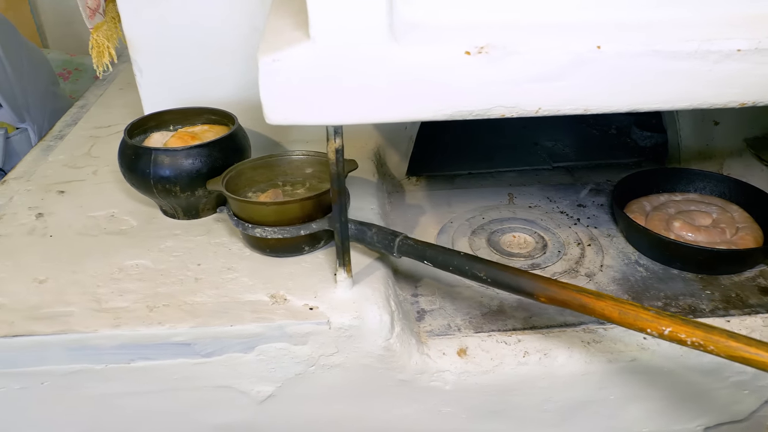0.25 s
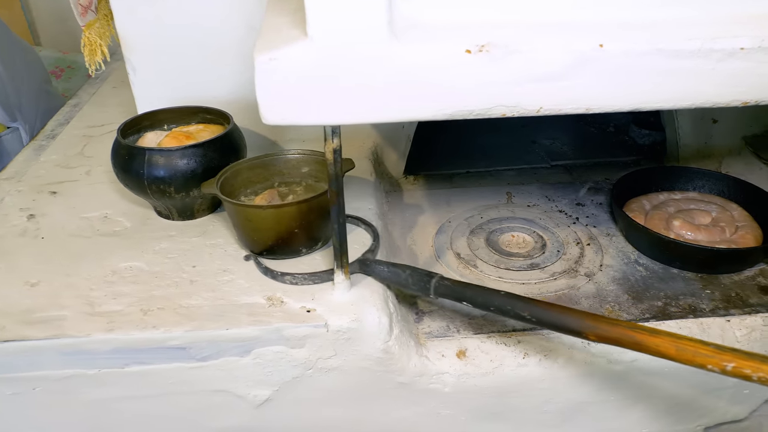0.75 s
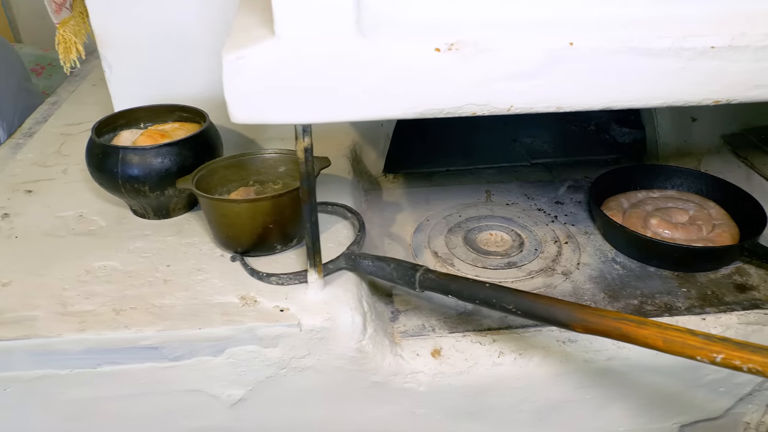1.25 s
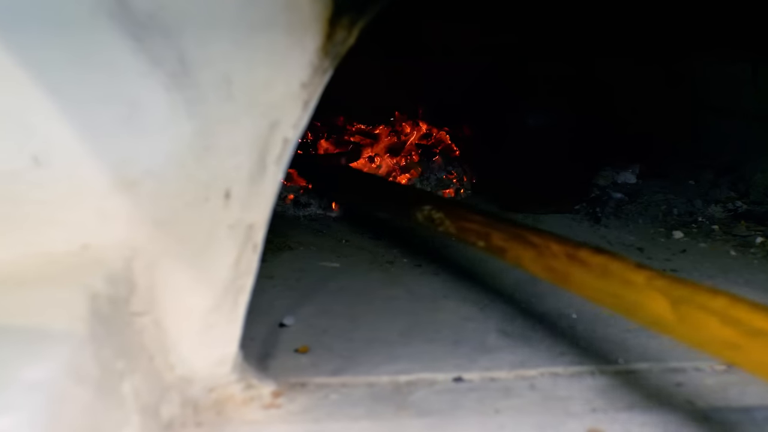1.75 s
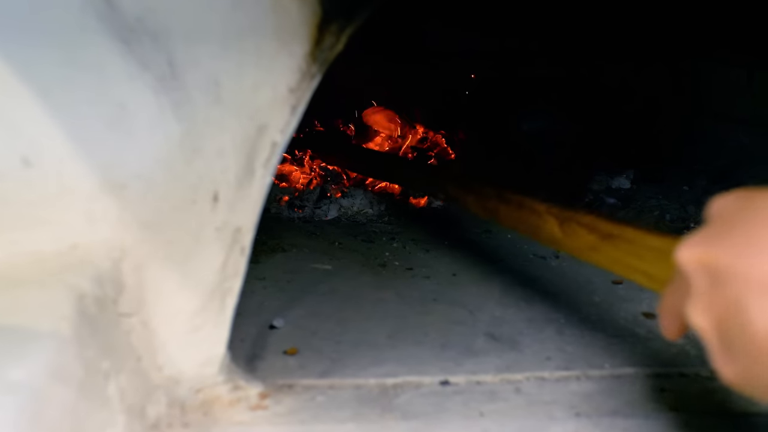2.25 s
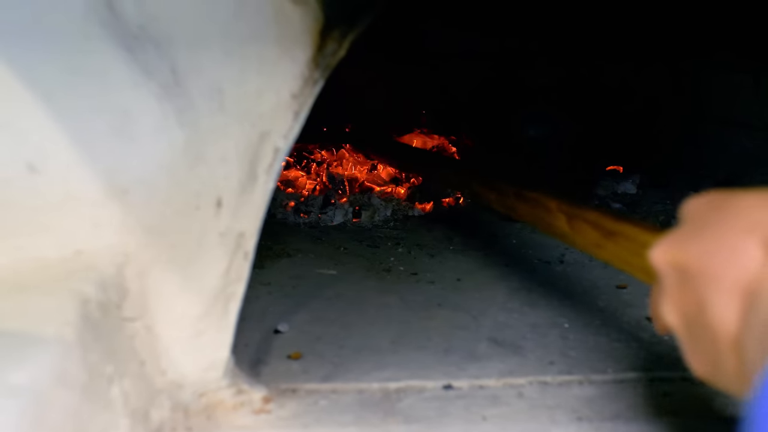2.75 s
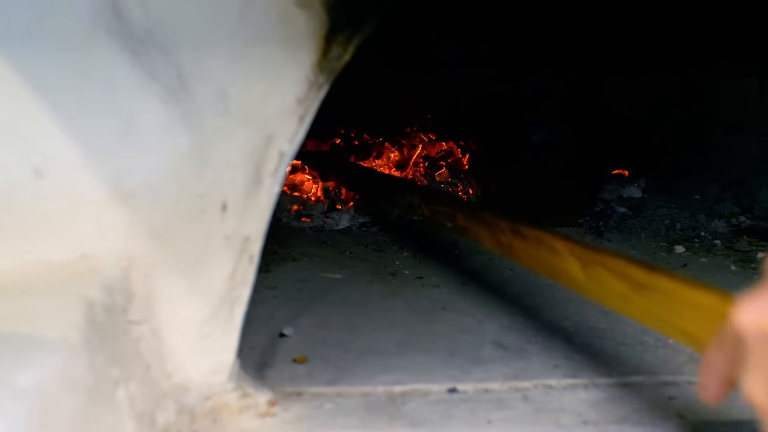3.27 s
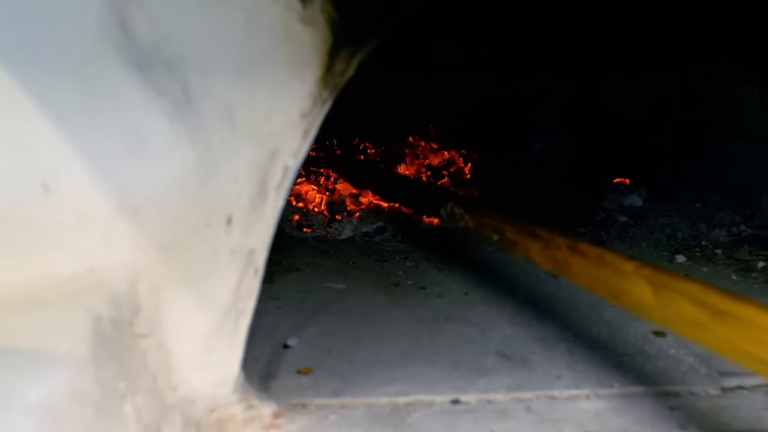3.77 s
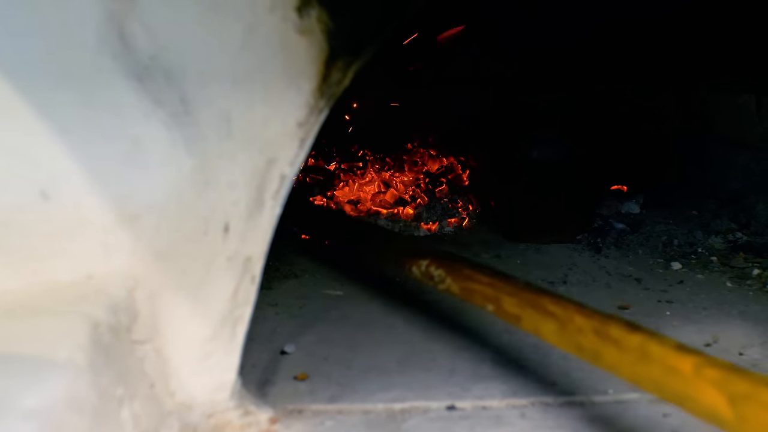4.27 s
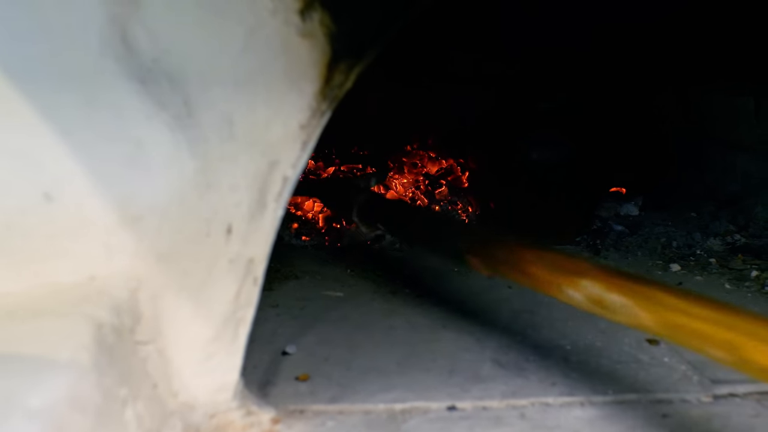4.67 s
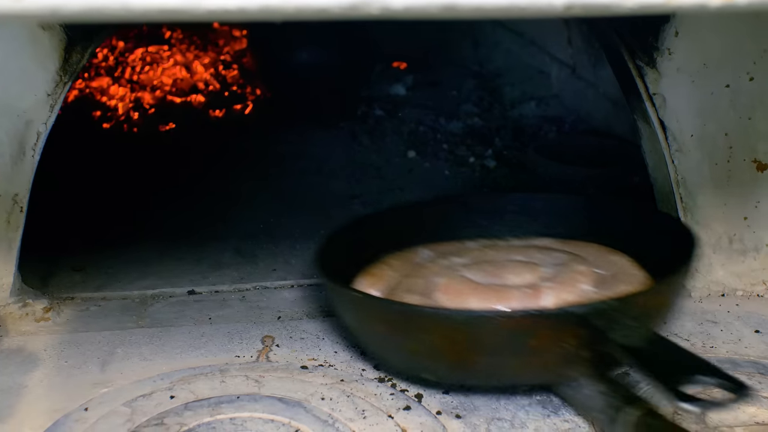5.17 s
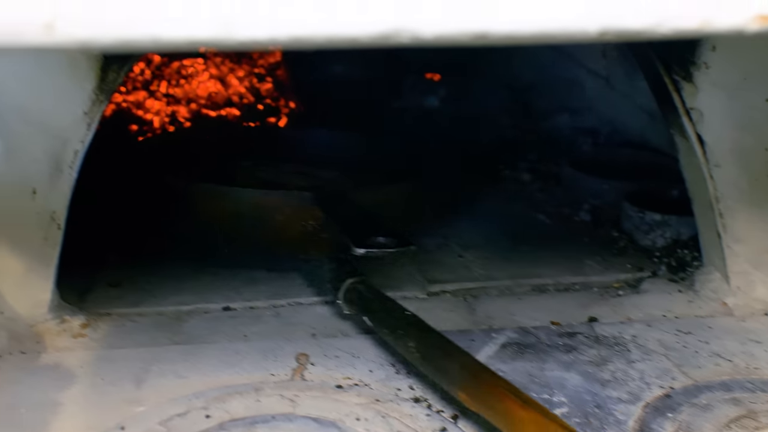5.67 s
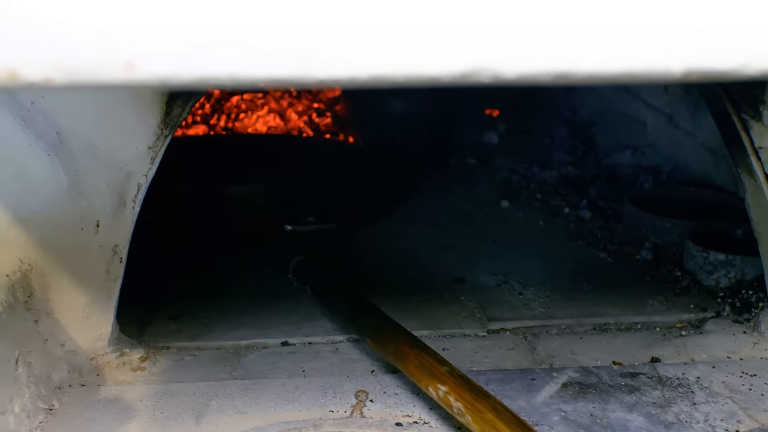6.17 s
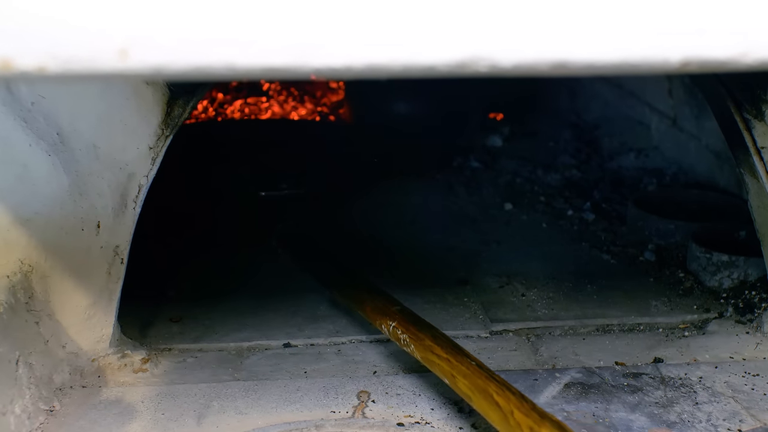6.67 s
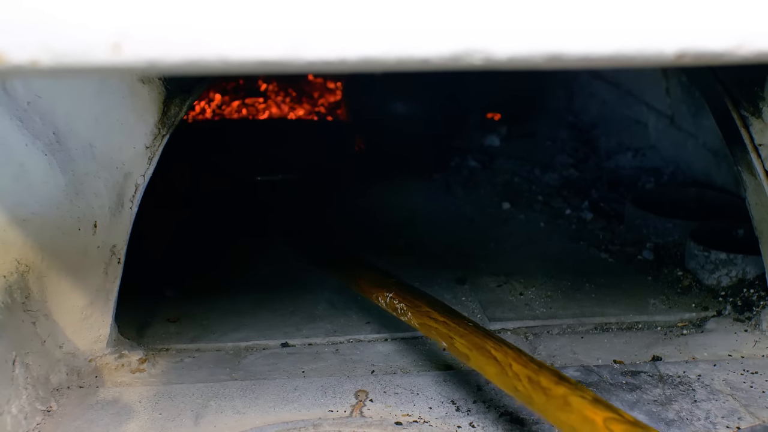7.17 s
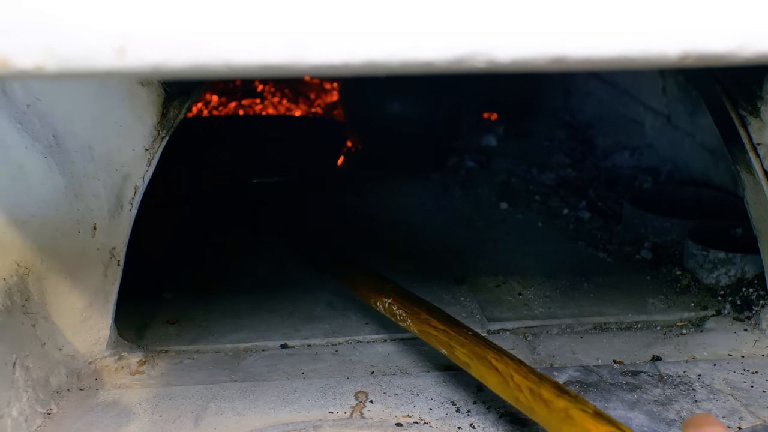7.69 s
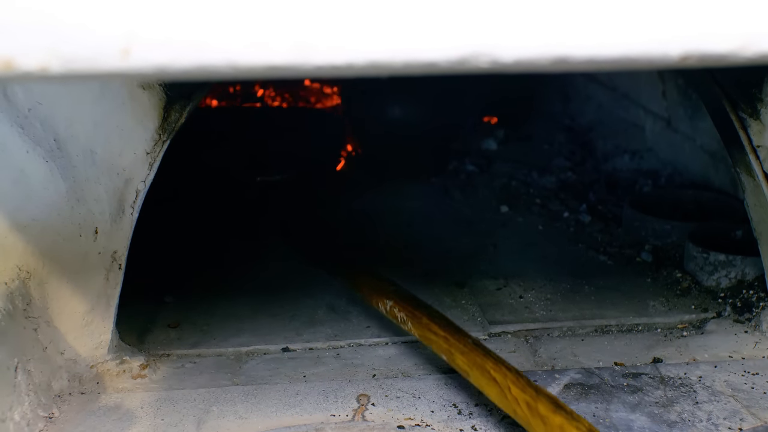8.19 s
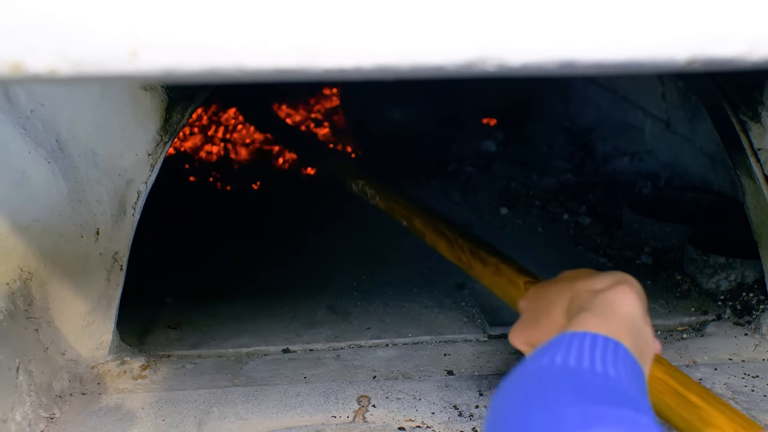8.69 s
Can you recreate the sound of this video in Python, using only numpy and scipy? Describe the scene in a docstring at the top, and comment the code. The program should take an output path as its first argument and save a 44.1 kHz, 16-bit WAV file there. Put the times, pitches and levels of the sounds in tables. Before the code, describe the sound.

Close phone sound in a quiet kitchen with faint low air and a short, dull brick-vault tail. From 0 to 1.4 s an iron fork makes light taps and small scrapes against a pot, with one sharper clack at 0.6. From 1.6 it jabs and rakes embers: hard clanks near 1.63, 2.2, 3.27, 3.76 and 4.23, crunchy strokes, snapping crumbs and thin squeals around 2.3 kHz. After a ringing skid at 4.35 it quiets. A heavy iron pan scrapes over gritty brick at 5.0-5.3, with a very faint falling whistle at 5.4. A loud clipped bang at 5.83 starts rough grinding, with another blow at 6.27; the harshest, loudest shoves come at 6.9-7.4. A duller knock follows at 7.7 in a lull. At 8.3 the fork squeals, clonks low and ringing at 8.54, and gives a short gritty rake at 8.88.

```python
"""Iron tool on a brick hearth

A long iron oven tool works close to a phone. First its forked head jabs and rakes through embers;
then it shoves a heavy cast-iron pan over the gritty floor and rakes once more. Grit and blows are a
train of small forces that drive damped modes of the iron and coloured crunch of brick and coal.
Chips, squeals, lone rings and a faint whistle join in. The brick vault adds a short tail over the
quiet kitchen air, and loud blows clip.
"""
import sys
import numpy as np
from scipy import signal
from scipy.fft import rfft, irfft
from scipy.io import wavfile
from scipy.ndimage import uniform_filter1d

SR = 44100
rng = np.random.default_rng(int(sys.argv[2]) if len(sys.argv) > 2 else 0)


def dump_mix(stems):
    """Bounce the given channels to the path in sys.argv[1] as a 16-bit WAV at rate SR."""
    frames = np.atleast_2d(stems).T  # one column per channel
    limited = np.clip(frames, -1, 1)  # hard clip at full scale
    pcm = np.round(limited * 32767).astype(np.int16)
    wavfile.write(sys.argv[1], SR, pcm)


N = 394254

# Every contact force has three parts: drag (between the two limits), thud (below) and crack (above)
THUD_HZ, CRACK_HZ = 600, 4500
PAN_FROM_S, PAN_TO_S = 4.33, 8.19  # the pan is shoved between these times, the fork works outside them


def undb(db):
    """Decibel law: the amplitude gain of a level in dB."""
    return 10 ** (np.asarray(db) / 20)


def unit(x):
    """Energy normalisation: the sum of squares becomes 1."""
    return x / np.sqrt(np.sum(x ** 2))


def fade(t60, size):
    """Exponential decay: 60 dB down after t60 s."""
    return np.exp(-np.log(1000) * np.arange(size) / SR / t60)


def walk(rate):
    """Slow random modulation: Gaussian levels 1 / rate s apart, joined by straight lines."""
    k = int(SR / rate)
    held = np.repeat(rng.standard_normal(N // k + 1), k)
    return uniform_filter1d(held, k)[:N]


def shape(points, size):
    """Spectral envelope: gain at each frequency of a transform, from (Hz, dB) points on a log axis."""
    hz, db = np.transpose(points)
    bins_hz = np.fft.rfftfreq(size, 1 / SR)
    return undb(np.interp(np.log(bins_hz + 1), np.log(hz), db))


def part_of(hz):
    """Band splitting: which force drives a frequency, 0 drag, 1 thud or 2 crack."""
    return np.where(hz < THUD_HZ, 1, np.where(hz > CRACK_HZ, 2, 0))


def ring(force, hz, t60):
    """Damped resonance: a complex one-pole filter; a white force of rms 1 gives a ring of rms 1."""
    pole = np.exp(2j * np.pi * hz / SR - np.log(1000) / (t60 * SR))
    gain = np.sqrt(2 * (1 - abs(pole) ** 2))
    return gain * signal.lfilter([1], [1, -pole], force + 1e-18).imag


def straying(force, hz, t60):
    """Resonance of drifting frequency: the force is shifted to 0 Hz, damped there and shifted back."""
    wander = 0.0078  # share by which the pitch strays as the contact moves
    turn = np.exp(2j * np.pi * np.cumsum(hz * (1 + wander * walk(12))) / SR)
    pole = np.exp(-np.log(1000) / (t60 * SR))
    swing = signal.lfilter([1], [1, -pole], (force + 1e-18) * turn.conj())
    return np.sqrt(2 * (1 - pole ** 2)) * (turn * swing).imag


def kitchen():
    """Stationary coloured noise: quiet room air and draught of the fire, swelling slightly."""
    # spectrum of the air: frequency_hz, relative_level_db
    air_spectrum = [(15, -14), (25, 21.5), (108, 5.5), (355, -8), (466, -5), (1020, -15.5), (2240, -16.5),
                    (10500, -26), (14900, -26), (16200, -45)]
    air = unit(irfft(rfft(rng.standard_normal(N)) * shape(air_spectrum, N), N))
    return air * np.sqrt(N) * undb(-43.5 + .8 * walk(3))


def whistle():
    """Frequency and amplitude modulation: a faint thin tone, unsteady in both, that bends down."""
    # course of the tone: time_s, pitch_hz, level_db
    tone_course = [(5.33, 4750, -60), (5.37, 5050, -61), (5.44, 4700, -63), (5.54, 3520, -66)]
    s, hz, db = np.transpose(tone_course)
    t = np.arange(N) / SR
    turn = np.cumsum(np.interp(t, s, hz) * (1 + .012 * walk(90))) / SR
    level_db = np.interp(t, s, db, -150, -150) + 6 * walk(50)
    return undb(level_db) * np.sin(2 * np.pi * turn)


def vault(dry):
    """Diffuse reverberation: short dense tail of the brick vault, duller than the direct sound."""
    t60_s, level_db, dull_hz = 0.085, -19.5, 3870
    size = SR // 2
    noise = signal.lfilter(*signal.butter(1, dull_hz, fs=SR), rng.standard_normal(size))
    tail = unit(noise * fade(t60_s, size))
    return dry + undb(level_db) * signal.oaconvolve(dry, tail)[:N]


def pings():
    """Free decay of single modes: each lone ring swells for a few milliseconds and dies away."""
    # lone rings: start_s, pitch_hz, level_db (before onset and decay), t60_s
    lone_rings = [(0.402, 434, -25.5, 0.22), (0.524, 199, -17, 0.082), (0.904, 202, -18.5, 0.078),
                  (1.285, 2550, -24.5, 0.15), (3.005, 974, -24.5, 0.17), (4.25, 3130, -33, 0.23),
                  (4.66, 2000, -47, 0.25), (5.199, 1600, -38.5, 0.51), (7.78, 240, -16, 0.037),
                  (7.862, 202, -18, 0.1), (8.538, 406, -6.5, 0.096)]
    out, size = np.zeros(N + SR), SR
    t = np.arange(size) / SR
    onset = 1 - np.exp(-t / 0.0013)
    for s, hz, db, t60 in lone_rings:
        out[int(s * SR):][:size] += undb(db) * onset * fade(t60, size) * np.sin(2 * np.pi * hz * t)
    return out[:N]


def squeal(drag_force):
    """Friction-driven resonance: an edge of the iron sings roughly on one pitch while it skids."""
    # skids: start_s, end_s, pitch_hz, level_db (re drag), t60_s
    skids = [(1.66, 1.87, 2322, -6, 0.19), (2.226, 2.53, 2310, -5.5, .12), (2.542, 2.758, 2460, 0.5, 0.089),
             (4.34, 4.6, 2233, 0, .6), (2.79, 3.08, 2315, -10, .1), (5.94, 6.272, 3270, -17, 0.09),
             (6.942, 7.405, 791, -10.5, 0.13), (8.301, 8.474, 2210, -0.5, 0.28)]
    t = np.arange(N) / SR
    return sum(undb(db) * straying(drag_force * (t > start) * (t < end), hz, t60)
               for start, end, hz, db, t60 in skids)


def chips(slide, db, per_s, count):
    """Random impulses on resonators: crumbs of coal and brick snap under the iron and ring briefly.

    Each of count pitches snaps per_s times a second on average, as hard as the slide presses.
    """
    pressure = uniform_filter1d(np.abs(slide), 256, axis=1)
    out = 0
    for hz in np.geomspace(900, 11000, count) * rng.uniform(.95, 1.05, count):
        snaps = (rng.random(N) < per_s / SR) * rng.standard_normal(N) * np.sqrt(SR / per_s)
        out = out + ring(snaps * pressure[part_of(hz)] + 1e-18, hz, 107.0 / hz)
    return undb(db) * out / np.sqrt(count / 2)


def crunch(force, points):
    """Non-resonant filtering: brick and coal only colour each force, by a minimum-phase response."""
    size = 2048
    # folding the cepstrum onto positive times makes the response causal
    cepstrum = irfft(np.log(shape(points, size)))
    cepstrum[1:size // 2] *= 2
    tap = irfft(np.exp(rfft(cepstrum[:size // 2], size)))
    out = 0
    parts = ((THUD_HZ, CRACK_HZ), "band"), (THUD_HZ, "low"), (CRACK_HZ, "high")
    for f, (hz, kind) in zip(force, parts):
        band = signal.butter(2, hz, kind, fs=SR, output="sos")
        out = out + signal.oaconvolve(f, unit(signal.sosfilt(band, tap)))[:N]
    return out


def bricks(slide, hit, early):
    """Dry contact noise: the crunch of brick and coal under the fork, then under the pan."""
    # crunch spectra: frequency_hz, relative_level_db
    fork_colour = [(26, -61), (45, -3.5), (150, -6.5), (234, 5), (363, -4.5), (2300, -12), (7000, -19),
                   (16000, -27.5)]
    pan_colour = [(26, -64.5), (70, -19.5), (280, 7), (838, 3.5), (1070, 1), (4200, -15), (5700, -24.5),
                  (8000, -23), (16000, -37)]
    under_fork = crunch(early * (slide + undb(-8) * hit), fork_colour)
    under_pan = crunch(~early * undb(-9) * (slide + hit), pan_colour)
    return under_fork + under_pan


def grit(spread_db, slip_db):
    """Stick-slip friction: dense grains of uneven size come in clumps as the contact catches. Rms 1."""
    size_db = spread_db * np.minimum(rng.exponential(size=N), 5)
    # the whole tool catches together, while each part also stutters on its own
    slip = walk(60) + 1.86 * np.array([walk(200), walk(90), 1.06 * walk(140)])
    grains = rng.standard_normal((3, N)) * undb(size_db + slip_db * slip)
    return grains / grains.std(axis=1, keepdims=True)


def drag():
    """Sliding friction: the drag, thud and crack forces of strokes that swell, hold and fade."""
    # strokes of the fork through the embers and shoves of the pan over the bricks:
    # full_speed_from_s, level_db (of the drag force), swell_s, hold_s, fade_s,
    # thud_db (heavy rumble re drag), crack_db (fine grit re drag)
    strokes = [(0.0, -46, .01, 0.0076, 0.27, 11, 3.5), (0.348, -46, 0.062, 0.13, 0.19, 1, -4.5),
               (0.514, -57, .005, 0.035, 0.18, 22, 1), (0.617, -31, 0.006, 0.0057, 0.2, -20, -16),
               (0.769, -31, 0.0018, 0.014, 0.1, -3, -3), (0.871, -39, 0.0088, 0.036, 0.2, 0, -7.5),
               (1.055, -37, 0.019, 0.026, 0.033, 5, -2), (1.236, -31, 0.25, 0.02, 0.18, -2, -4),
               (1.627, -20, 0.046, 0.013, 0.034, -8, -4), (1.657, -36, 0.025, 0.16, 0.18, -1, -5.5),
               (1.886, -57, 0.13, 0.2, 0.16, 16.5, -2.5), (2.182, -20, 0.016, 0.0054, 0.078, 0.5, -4.5),
               (2.344, -33.5, 0.27, 0.077, 0.23, -2, -1.5), (2.788, -28, 0.016, 0.031, 0.048, 5.5, 1),
               (2.851, -39, 0.052, 0.082, 0.3, 9.5, 1.5), (3.162, -37.5, 0.017, 0.042, 0.082, 0.5, -2.5),
               (3.272, -32.5, 0.086, 0.05, 0.2, -5.5, -2), (3.748, -30, 0.023, 0.0076, 0.16, 1, -2),
               (4.201, -24, 0.0047, 0.029, 0.092, -7, -9.5), (4.338, -42.5, 0.083, 0.036, 0.43, -9.5, -30),
               (4.536, -46.5, 0.041, 0.14, 0.96, -10, 7.5), (4.978, -16, 0.2, 0.16, 0.13, -7.5, -5),
               (5.265, -52, 0.055, 0.055, 1.8, 2, -1), (5.835, -17, 0.0092, 0.0042, 0.031, -5, 2),
               (5.87, -23, 0.04, 0.11, .1, -7.5, -17), (5.975, -18, 0.1, 0.15, 0.29, -11.5, -35),
               (6.273, -17, 0.33, 0.091, 0.36, -3.5, -13), (6.418, -18, 0.082, 0.21, 0.19, -5.5, -9.5),
               (6.76, -42, .1, 0.14, .1, -5, 8), (6.961, -10, 0.13, 0.057, 0.1, -3.5, -8.5),
               (7.143, -10.5, 0.14, 0.058, 0.23, -3.5, -21), (7.322, -6.5, 0.059, 0.037, 0.11, -3.5, -13.5),
               (7.475, -32, 0.039, 0.014, 0.23, 0.5, -6.5), (7.692, -31.5, 0.011, 0.0058, 0.051, 8, -3),
               (7.713, -40, 0.022, 0.02, 0.36, 8.5, 0), (8.249, -35, 0.09, 0.043, 0.37, 5, -11.5),
               (8.356, -42.5, 0.083, 0.015, 0.16, -8, 7), (8.534, -18.5, 0.0033, 0.009, 0.021, 10, -37),
               (8.568, -35.5, .02, 0.011, 0.24, 14.5, -27), (8.875, -20.5, 0.029, 0.013, 0.057, 0.5, -7.5)]
    swell_db = 30  # swell and fade lengths are counted over this many dB
    t, power = np.arange(N) / SR, np.zeros((3, N))
    for s, level_db, swell, hold, fall, thud_db, crack_db in strokes:
        away = np.maximum((s - t) / max(swell, 1e-3), (t - s - hold) / max(fall, 1e-3))
        near = away < 2
        parts_db = level_db + np.array([[0], [thud_db], [crack_db]])
        power[:, near] += undb(parts_db - swell_db * np.maximum(away[near], 0)) ** 2
    return np.sqrt(power) * grit(spread_db=2.2, slip_db=2.1)


def blows():
    """Impact: one sharp tap, then a chatter as the iron settles; a catch is a small bright blow."""
    # blows and ticks: start_s, level_db (relative), thud_db (re level), crack_db (re level), chatter_ms
    impacts = [(0.039, -17.5, 7.5, 4, 0.73), (0.388, -20, -21, -17, 3.5), (0.402, -18, -33, -4.5, 11.3),
               (0.519, -22.5, 16, 10, 2.1), (0.6, -2, -41, 0, 8), (0.83, -18, -22, -24, 2.4),
               (0.861, -20.5, -20, 2.5, 4.5), (1.047, -20.5, -24.5, -9, 3.5), (1.596, -23, 0, 3, 6.4),
               (1.633, -7.5, -9, -3, 5.7), (1.782, -20.5, -3, -4, 3.7), (2.180, 1, -17, -18.5, 7.6),
               (2.315, -6, -32, -8, 4.1), (2.476, -25, 3, 18, 2.1), (2.794, -19, -15, 0, 23),
               (3.228, -13.5, -45, -23, 11), (3.27, 3, -7, -17, 2.35), (3.332, -16, -5, -17, 7.6),
               (3.448, -19.5, -4, 3.5, 4.3), (3.753, -2, -21, -8, 3.2), (3.767, -1, -41, -23, 6.8),
               (4.194, -12, -10, 7, 2.4), (4.231, -0.5, -15, -2.5, 6.1), (4.592, -27, -9.5, -5, 8.3),
               (5.832, 11.5, -8.5, -20, 2.5), (6.266, 2, -2.5, -22, 9.6), (7.299, 1.5, -3, -23, 6.9),
               (7.697, -5.5, -0.5, -5.5, 1.9), (8.244, -18, 21.5, -11.5, 2.1), (8.537, -3.5, 1, -35, 9.8),
               (8.638, -14.5, 0, -29, 6.7), (8.857, -19, -14, 4, 7.7)]
    # grains of grit that jam under the iron and crack: start_s, level_db (relative)
    jams = [(0.1144, -29), (0.1413, -28), (0.169, -32), (4.4907, -37), (4.537, -27), (4.645, -28),
            (4.9076, -27), (4.9307, -20), (4.9688, -4.5), (5.0554, -11), (5.1274, -7), (5.1805, -10),
            (5.562, -32), (5.655, -25), (5.7374, -46), (5.7857, -38), (5.91, -15), (5.9574, -22),
            (6.1868, -15), (6.314, -28), (6.4213, -10.5), (6.4748, -10), (6.5675, -13), (6.5959, -13),
            (6.624, -16.5), (6.8107, -27.5), (6.9272, -15), (6.9463, -5.5), (6.9586, -4), (7.0164, -12),
            (7.069, -13), (7.1215, -16), (7.1571, -11), (7.1801, -22), (7.228, -7), (7.256, -14),
            (7.2843, -18), (7.333, 0.5), (7.347, -13), (7.3665, -6), (7.4295, -26)]
    size = 4096
    force = np.zeros((3, N + size))
    ms = 1000 * np.arange(size) / SR
    rows = [(s, db + np.array([0, thud_db, crack_db]), chatter_ms)
            for s, db, thud_db, crack_db, chatter_ms in impacts]
    # catches: gain in dB on the drag, thud and crack parts, then chatter time in ms
    rows += [(s, db + np.array([-3, -18, 3]), 4.2) for s, db in jams]
    for (s, db, chatter_ms), rough in zip(rows, rng.standard_normal((len(rows), 3, size))):
        push = rough * (1 - np.exp(-ms / .3)) * np.exp(-ms / max(chatter_ms, .3))
        push[:, 0] = 4  # the tap
        at = int(s * SR)
        force[:, at:at + size] += 0.54 * undb(db)[:, None] * push
    return force[:, :N]


def iron(force, modes, shift_db, shift_rate):
    """Modal synthesis: as the contact wanders, each mode is driven more or less and strays in pitch."""
    out = 0
    for hz, db, t60 in modes:
        drive = force[part_of(hz)] * undb(db + shift_db * walk(shift_rate))
        out = out + straying(drive, hz, t60)
    return out


def rim(force, t):
    """Contact damping: the pan's rim rings out only while little weight rests on it."""
    # modes of the rim: frequency_hz, level_db (re the force), t60_s
    rim_modes = [(937, -8, .29), (1513, -11, .8), (1617, -11, .9), (1803, -10, .25), (2211, -3, 0.38),
                 (2575, -14, 0.2), (2990, -7, 0.3), (3865, -12, .3), (4935, -13, 0.33)]
    # times of little weight: start_s, end_s, level_db (gain added to the loaded one)
    free_spells = [(4.431, 4.853, -28), (7.33, 7.44, -34), (8.242, 8.627, -7.5)]
    loaded_db = -28
    freedom = undb(loaded_db) + sum(undb(db) * (t > a) * (t < b) for a, b, db in free_spells)
    on_rim = (t > PAN_FROM_S) * force * freedom
    return sum(undb(db) * ring(on_rim, hz, t60) for hz, db, t60 in rim_modes)


def pan(slide, hit, early):
    """Forced vibration of a heavy plate: grit and blows ring the cast-iron pan."""
    # modes of the pan: frequency_hz, level_db (re the force on their part), t60_s
    pan_modes = [(136.6, -19.5, 0.57), (232.6, -12.5, 0.33), (310.7, -3.5, 0.11), (419, -9, 0.17),
                 (448.7, -5.5, 0.1), (628, -14, 0.062), (847, -9, 0.059), (954, -14.5, 0.057),
                 (1298, -14.5, 0.045), (1487, -22, 0.064), (1768, -20, 0.16), (2250, -17, 0.027),
                 (2702, -16.5, 0.06), (2850, -25.5, .06), (3230, -23.5, 0.04), (3550, -25.5, 0.034),
                 (4000, -22, 0.035), (6480, -25, 0.027), (6950, -19, .012), (7400, -21, 0.012),
                 (10040, -32, 0.025)]
    return iron(~early * (undb(-4.5) * slide + hit), pan_modes, shift_db=7.0, shift_rate=14.0)


def fork(slide, hit, early, t):
    """Forced vibration of a bar: blows reach the forked iron better than sliding grit does."""
    # modes of the fork: frequency_hz, level_db (re the force on their part), t60_s
    fork_modes = [(119.3, -13, 0.38), (233.7, -10, 0.19), (298, -15.5, 0.2), (898, -27, 0.23),
                  (1446, -11, 0.035), (1802, -18.5, 0.038), (2299, -6, 0.057), (2553, -12.5, 0.059),
                  (3180, -14.5, 0.046), (7150, -10, 0.0018)]
    # for the first second the fork leans on a pot, which mutes its ring in the drag band by 8 dB
    held = undb(-8 * np.outer([1, 0, 0], t < 1.0))
    return iron(early * held * (undb(-13) * slide + hit), fork_modes, shift_db=2.2, shift_rate=9.0)


def scene():
    """Superposition: shared forces ring the fork, then the pan, then the fork again, under the vault."""
    slide, hit, t = drag(), blows(), np.arange(N) / SR
    early = (t < PAN_FROM_S) | (t > PAN_TO_S)  # True whenever the fork works
    metal = fork(slide, hit, early, t) + pan(slide, hit, early) + rim((slide + hit)[0], t)
    crumbs = chips(slide, db=-11, per_s=70, count=24)
    hearth = metal + bricks(slide, hit, early) + crumbs + squeal(slide[0]) + pings()
    return (vault(hearth) + whistle() + kitchen())[None]


def record(dry):
    """Band limiting and clipping: the phone's microphone thins deep bass, clips and cuts the top."""
    bass_cut_hz, top_hz, clip_level = 79.4, 16150, .93
    thin = signal.sosfilt(signal.butter(2, bass_cut_hz, "high", fs=SR, output="sos"), dry)
    clipped = np.clip(thin, -clip_level, clip_level)
    return signal.sosfilt(signal.ellip(10, .2, 80, top_hz, fs=SR, output="sos"), clipped)


dry = scene()
out = record(dry)
dump_mix(out)
```